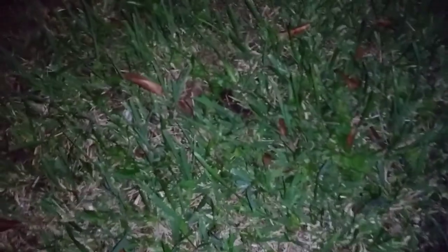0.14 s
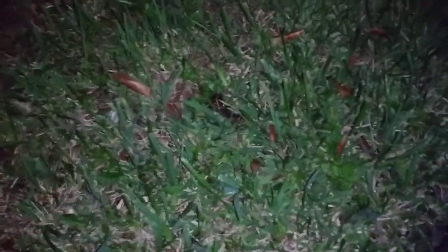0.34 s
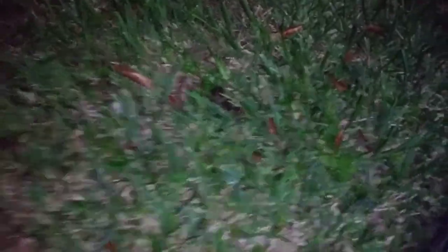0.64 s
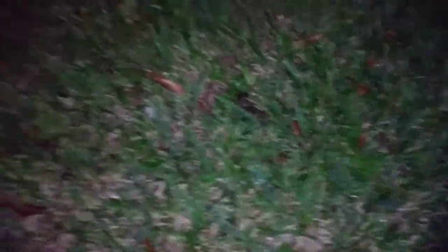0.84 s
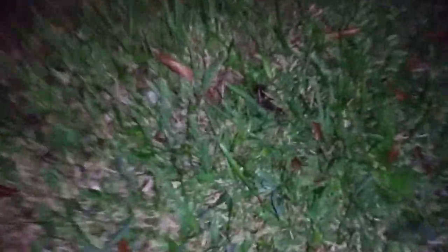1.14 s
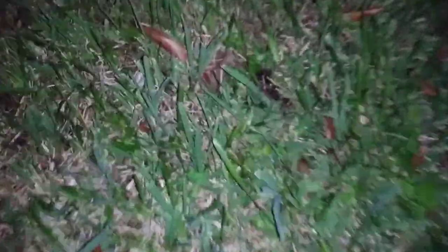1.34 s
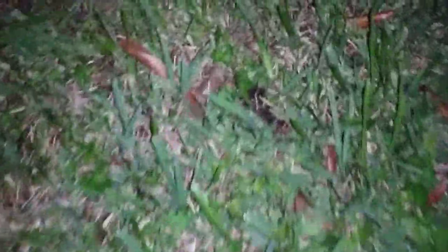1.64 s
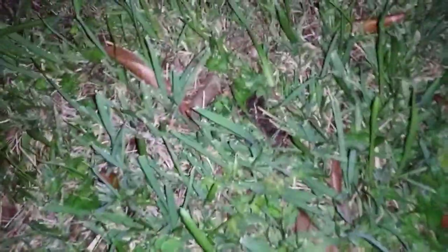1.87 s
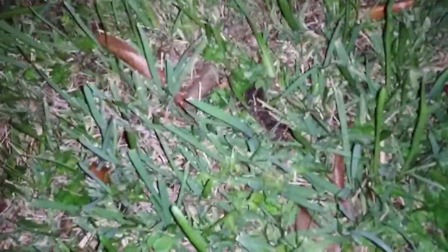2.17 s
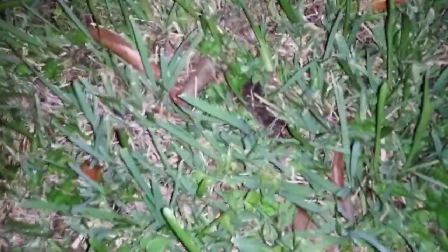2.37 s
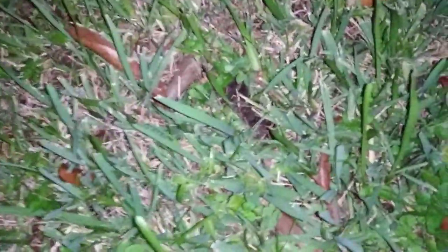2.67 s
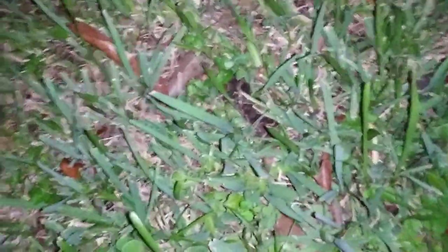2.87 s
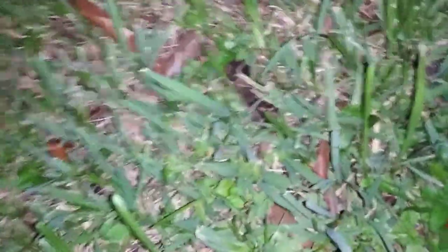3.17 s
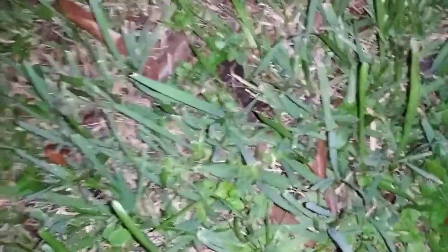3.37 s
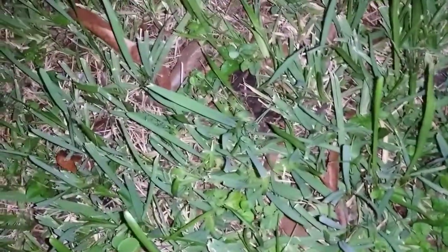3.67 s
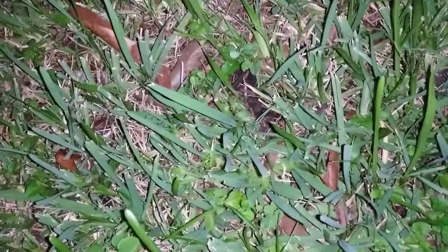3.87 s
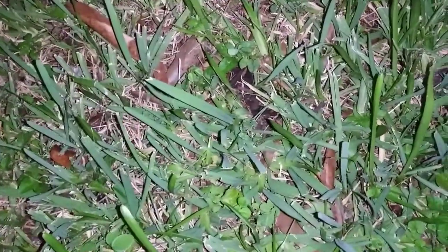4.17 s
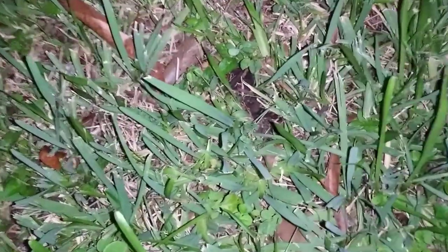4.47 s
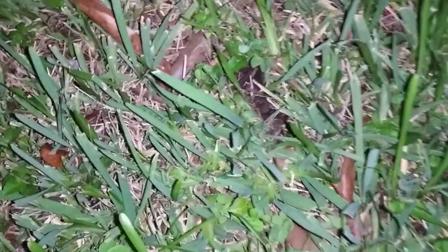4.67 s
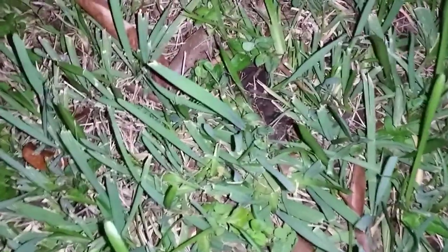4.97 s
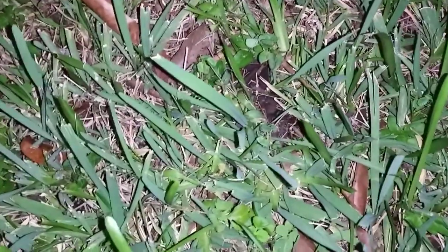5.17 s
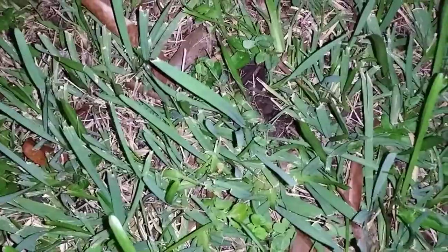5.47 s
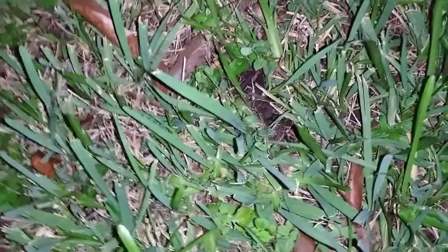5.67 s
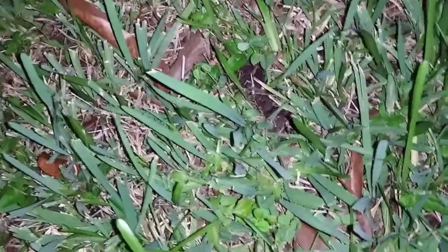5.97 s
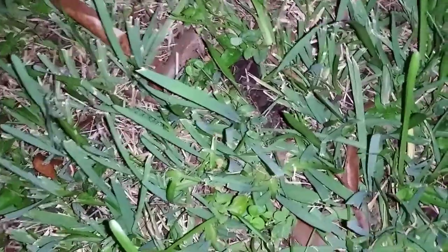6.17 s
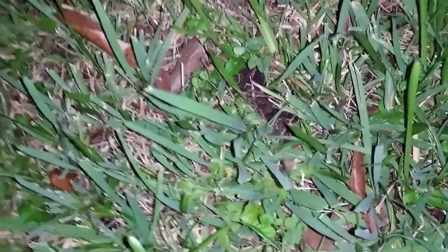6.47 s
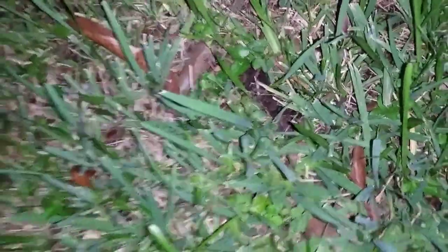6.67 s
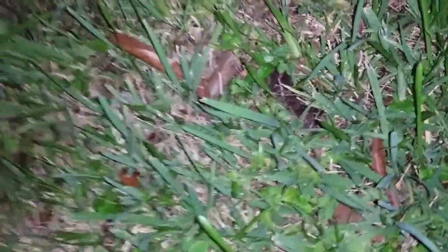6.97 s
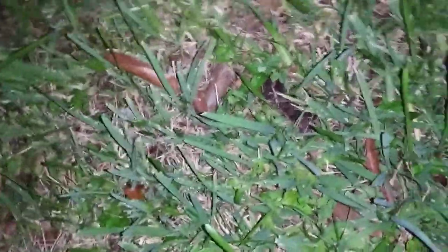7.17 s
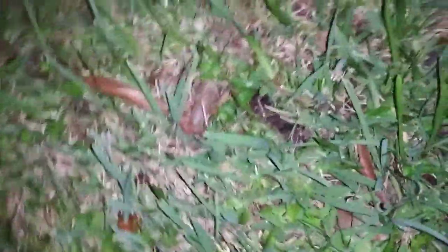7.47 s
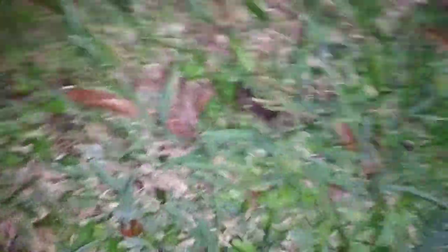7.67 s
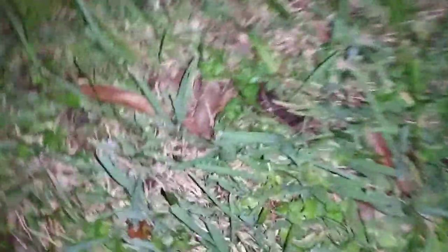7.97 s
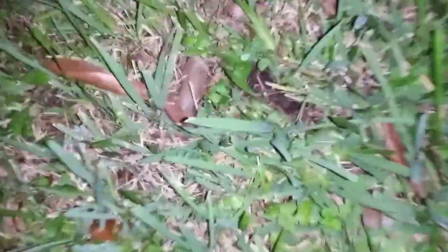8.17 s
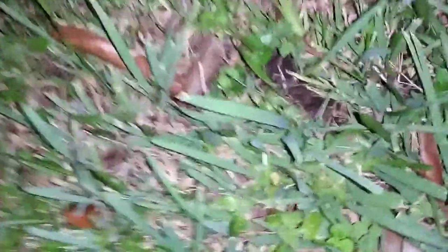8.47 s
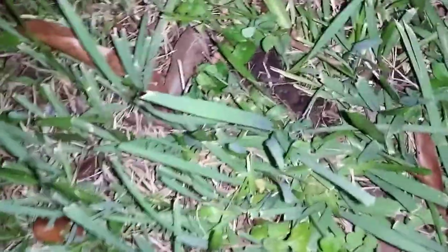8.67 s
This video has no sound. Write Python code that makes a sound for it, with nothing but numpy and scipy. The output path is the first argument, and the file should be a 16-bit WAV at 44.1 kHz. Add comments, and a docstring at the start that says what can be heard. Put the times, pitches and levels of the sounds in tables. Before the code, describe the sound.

Outdoors on a lawn at night, a dense, shrill insect chorus runs from start to end, one near singer fluttering in front of a hazy group. Underneath is faint traffic noise with a weak far tone. The hand-held phone picks up early ticks and crackly grass brushes, then a calm stretch of only trilling, two faint chirps, and a busier run of dry clicks, dull knocks and rustling before the trill continues alone.

```python
"""A near insect trills on a night lawn, about 180 wing strokes a second, each a short tone near 7 kHz.
Six farther singers blur behind it, with echoes from ground and walls. Distant traffic is coloured noise
with faint steady tones; grass rustles as bands of crackle. The microphone is in a hand-held phone,
which ticks and knocks as it is moved: short decaying rings. Two short chirps sound near 6 kHz."""
import sys
import numpy as np
from scipy import signal
from scipy.fft import rfft, irfft, next_fast_len
from scipy.io import wavfile
from scipy.ndimage import uniform_filter1d, map_coordinates

SR = 44100
rng = np.random.default_rng(int(sys.argv[2]) if len(sys.argv) > 2 else 0)


def natural_amplitude(level_db):
    """Convert a level in decibels to a linear amplitude factor, elementwise."""
    exponent = np.asarray(level_db, float) / 20
    return 10 ** exponent


def dump_mix(stems):
    """Bounce the given channels to the path in sys.argv[1] as a 16-bit WAV at rate SR."""
    frames = np.atleast_2d(stems).T  # one column per channel
    limited = np.clip(frames, -1, 1)  # hard clip at full scale
    pcm = np.round(limited * 32767).astype(np.int16)
    wavfile.write(sys.argv[1], SR, pcm)


N = 388521  # samples


def unit(x):
    """Scaled to rms 1."""
    return x / np.sqrt(np.mean(x ** 2) + 1e-20)


def curve(rows):
    """One value per sample, in straight lines between (seconds, value) rows."""
    s, values = np.transpose(rows)
    return np.interp(np.arange(N) / SR, s, values)


def wobble(rate):
    """A smooth random curve around zero, with rate knots a second."""
    steps = np.arange(0, N + 16, 16)
    knots = rng.standard_normal(int(N * rate / SR) + 4)
    coarse = map_coordinates(knots, [steps * rate / SR])
    return np.interp(np.arange(N), steps, coarse)


def coloured(x, spectrum):
    """Filters x by (Hz, dB) points joined on a log frequency axis."""
    size = next_fast_len(N + 8192)
    hz, db = np.transpose(spectrum)
    log_hz = np.log(np.fft.rfftfreq(size, 1 / SR) + 1)
    gain = natural_amplitude(np.interp(log_hz, np.log(hz), db))
    return irfft(rfft(x, size) * gain, size)[:N]


# Level of the far traffic and hiss. Each row: time in seconds, level in dB.
AIR_LEVEL = [(0, -52.5), (2.1, -53.5), (7, -53.5), (8.81, -53)]
# Colour of traffic and hiss. Each row: frequency in Hz, relative level in dB.
AIR_COLOUR = [(20, -17), (70, -14), (100, -8.5), (220, -1), (480, 1), (800, 2), (1000, 4), (1900, -2.5),
              (2400, -8), (3100, -10.5), (3500, -16), (5600, -14), (8500, -17.5), (10000, -23.5),
              (13000, -27), (16000, -28)]


def far_traffic():
    """Distant traffic and hiss: coloured noise that swells gently."""
    level_db = curve(AIR_LEVEL) + 0.5 * wobble(3.19) + 0.51 * wobble(12)
    return natural_amplitude(level_db) * unit(coloured(rng.standard_normal(N), AIR_COLOUR))


# Steady far tones. Each row: pitch in Hz, middle level in dB before any swell.
FAR_TONES = [(499, -71), (1044, -65.5), (1296, -81)]
# The middle tone swells twice, then fades. Each row: time in seconds, added level in dB.
MIDDLE_SWELL = [(0, 10.5), (.5, 6.5), (.65, -7), (.9, 8.5), (1.3, 6), (1.5, -4.5), (8.81, -12)]


def far_hum():
    """Faint far sine tones that waver in level and phase."""
    t = np.arange(N) / SR
    tones = []
    for hz, db in FAR_TONES:
        level = natural_amplitude(db + 3.0 * wobble(14))
        tones.append(level * np.sin(2 * np.pi * hz * t + 1.13 * wobble(10)))
    tones[1] = tones[1] * natural_amplitude(curve(MIDDLE_SWELL))
    return sum(tones)


# Brushes of grass. Each row: time of the crest in seconds, fade length in seconds, level in dB,
# centre in Hz, half width in octaves.
BRUSHES = [(0.155, 0.019, -54, 4300, 0.46), (0.312, .034, -61, 2200, 0.35), (.368, .014, -58, 4500, .54),
           (0.588, .011, -51, 5540, 0.22), (.59, .011, -64, 7000, 1.2), (0.654, .007, -64, 4500, .6),
           (0.876, .028, -56.5, 2780, 1.03), (1.192, 0.17, -68, 3000, 1.1), (6.565, .04, -67, 5630, .12),
           (7.047, .11, -65, 6800, 0.9), (7.228, 0.053, -47.5, 5460, 0.85), (7.3, 0.075, -53, 6440, 0.57),
           (7.574, 0.2, -58, 3750, 0.9), (7.922, 0.012, -52.5, 5870, 0.48), (7.96, 0.037, -60, 3970, .83)]


def grass():
    """Each brush of blades or fingers swells and fades in its own band of fine crackle."""
    rise_share = 0.84  # a brush swells faster than it fades
    snaps = (rng.random(N) < 150 / SR) * rng.standard_normal(N) * 9  # single stalks breaking free
    roughness_db = 2.5 * wobble(900) + 1.7 * wobble(150)
    crackle = unit(rng.standard_normal(N) * natural_amplitude(roughness_db) + snaps)
    hz, t, spectrum = signal.stft(crackle, SR, nperseg=128, noverlap=96)
    power = np.zeros(spectrum.shape)
    for s, length, db, centre_hz, octaves in BRUSHES:
        side_length = np.where(t < s, rise_share * length, length)
        stroke = np.exp(-((t - s) / side_length) ** 2)
        band = np.exp(-(np.log2((hz + 1) / centre_hz) / octaves) ** 2)
        power += natural_amplitude(2 * db) * np.outer(band / band.mean(), stroke)
    return signal.istft(spectrum * np.sqrt(power), SR, nperseg=128, noverlap=96)[1][:N]


# Contacts at the phone, and two short chirps near 6 kHz at 6.55 and 6.58 s.
# Each row: start in seconds, ring level in dB before its decay, pitch in Hz,
# treble level in dB before its decay, 60 dB decay time of the ring in seconds.
SHORT_RINGS = [(.1238, -8.5, 2770, -30, 0.0024), (1.1048, -41, 980, -70, 0.024),
               (1.172, -39, 1150, -70, 0.011), (1.208, -41, 1270, -58, 0.013),
               (1.2997, -19.5, 1660, -56, 0.0043), (6.549, -52, 5950, -80, .04),
               (6.58, -51, 6000, -80, .04), (7.1925, -36, 1250, -48, .01), (7.2790, -33, 5200, -28, .003),
               (7.2998, -31, 1700, -50, 0.0035), (7.3305, -34, 1020, -37, 0.017),
               (7.3755, -41, 5200, -52, .003), (7.409, -40.5, 1020, -40, 0.023),
               (7.44, -46, 5200, -48, .003), (7.524, -37.5, 2260, -70, .006),
               (7.5257, -25, 4600, -48, 0.0024), (7.6398, -36.5, 1430, -52, .02),
               (7.7385, -35, 4300, -52, .005), (7.7414, -36, 2670, -62, .008),
               (7.9104, -25.5, 1870, -65, 0.019), (7.9115, -41, 5000, -70, .008),
               (7.9655, -32, 3600, -54, 0.0031)]


def ticks_and_chirps():
    """Each tick or chirp: a rough decaying ring at its own pitch and a spit of treble."""
    out, t = np.zeros(N + SR), np.arange(SR // 20) / SR
    noise = rng.standard_normal((len(SHORT_RINGS), len(t) + 2))
    for (s, db, hz, treble_db, t60), fizz in zip(SHORT_RINGS, noise):
        rough = 0.66 * (uniform_filter1d(fizz, size=4) - uniform_filter1d(fizz, size=16))[2:]
        ring = natural_amplitude(db - 60 * t / t60) * (np.sin(2 * np.pi * hz * t) + rough)
        spit = natural_amplitude(treble_db - 60 * t / 0.003) * np.diff(fizz)[1:]
        sound = (ring + spit) * (1 - np.exp(-t / 0.0001))
        # a small source pushes no net air: a slow counter-push cancels the sum
        sound = sound - np.exp(-t / 0.001) * sound.sum() / (0.001 * SR)
        out[round(s * SR):][:len(t)] += sound
    return out[:N]


# Modes of the phone's case. Each row: pitch in Hz, relative level in dB, 60 dB decay time in seconds.
CASE_MODES = [(506, 0.5, 0.021), (795, 7, 0.012)]
# Dull knocks of the case. Each row: start in seconds, gain on the case's ring in dB.
CASE_KNOCKS = [(1.1048, -42), (1.2994, -32.5), (7.6398, -46), (7.739, -34.5), (7.9094, -26.5),
               (7.9643, -35)]


def knocks():
    """Harder contacts ring the modes of the phone's case, with a soft onset."""
    out, t = np.zeros(N + SR), np.arange(SR // 20) / SR
    ring = sum(natural_amplitude(db - 60 * t / t60) * np.sin(2 * np.pi * hz * t) for hz, db, t60 in CASE_MODES)
    case = ring * (1 - np.exp(-t / 0.0018))
    for s, db in CASE_KNOCKS:
        out[round(s * SR):][:len(t)] += natural_amplitude(db) * case
    return out[:N]


def singer(rate, wing_hz, jitter_s=6e-6, size_db=1.3, swell_s=0.00092, sag_hz=120, overtone_db=-26):
    """Each wing stroke swells and dies as a short tone whose pitch sags; it overlaps the stroke before."""
    strokes = np.cumsum(rate) / SR + rng.random()
    index = strokes.astype(int)
    chance = rng.standard_normal((index[-1] + 2, 2))
    late, size = jitter_s * chance[:, 0], natural_amplitude(size_db * chance[:, 1])
    out = np.zeros(N)
    for back in range(2):  # this stroke, then the tail of the one before
        which = index + 1 - back
        age = (strokes - index + back) / rate  # seconds since the stroke began
        grown = age / swell_s
        swell = grown ** 2 * np.exp(-2 * grown)
        pitch = wing_hz - sag_hz * (grown / 4 - 1)
        wing = np.sin(2 * np.pi * pitch * (age + late[which]))
        # a slightly lopsided swing adds the octave
        out += size[which] * swell * wing * (1 + natural_amplitude(overtone_db) * wing)
    return unit(out)


def scattered(x, echo_db):
    """Adds echoes off ground and walls; each one fades in and out as the phone moves."""
    delays = rng.integers(40, 1800, size=3)  # samples
    echoes = sum(wobble(5) * np.roll(x, d) for d in delays)
    return unit(x + natural_amplitude(echo_db) * echoes)


# The band the singers fill. Each row: frequency in Hz, relative level in dB.
WING_BAND = [(4500, -62), (6000, -7.5), (6300, 1), (6900, -7.5), (7400, -10.5), (7900, -15.5), (9000, -12),
             (13300, -34), (14500, -7.5), (15500, -35)]


def wing_colour(x):
    """Shapes the trill to the singers' band, at rms 1."""
    return unit(coloured(x, WING_BAND))


# The farther singers. Each row: wing pitch in Hz, relative level in dB, echo level in dB,
# rate drift in strokes per second, stroke jitter in seconds.
FAR_SINGERS = [(7290, -2, -3, 1.1, 0.0000087), (7160, -5, -5, 1.5, 0.0000089),
               (6850, -3.5, -4, 2.2, 0.000017), (6974, -3.5, -8.5, 2.2, 0.000025),
               (7063, -1.5, -5, 2.2, 0.000023), (7290, -4, -2.5, 2.2, 0.000015)]
# Level of all farther singers together. Each row: time in seconds, level in dB before wavering.
FAR_LEVEL = [(0, -44), (1, -46), (1.6, -44), (3, -46), (6, -46), (8.5, -47), (8.81, -49)]


def far_singers():
    """A blur of farther insects whose stroke rates drift and whose joint level wavers."""
    mean_rate = 180.8  # strokes per second
    blur = np.zeros(N)
    for hz, db, echo_db, drift, jitter_s in FAR_SINGERS:
        trill = singer(mean_rate + drift * wobble(0.7), hz, jitter_s=jitter_s)
        blur += natural_amplitude(db) * scattered(trill, echo_db)
    return natural_amplitude(curve(FAR_LEVEL) + wobble(7)) * wing_colour(blur)


# The near singer's effort: it tires slowly and twice rallies.
# Each row: time in seconds, rate in strokes per second.
NEAR_EFFORT = [(0, 179.6), (.6, 179.32), (2.4, 177.4), (4.35, 176.5), (4.5, 176.9), (4.9, 179.55),
               (5.1, 179.97), (5.3, 179.9), (5.9, 178.94), (6.55, 177.5), (6.75, 177.62), (7.05, 180.05),
               (7.3, 180.9), (7.6, 180.7), (8.8, 177.96)]
# The near singer's level at the moving phone. Each row: time in seconds, level in dB before flutter.
NEAR_LEVEL = [(0, -40.5), (.62, -42.5), (.8, -47), (1.5, -49), (1.9, -43.5), (2.2, -60), (2.6, -45.5),
              (3.2, -43), (3.8, -45.5), (4.2, -47), (5.1, -45.5), (5.9, -48.5), (6.7, -46.5), (7.2, -45.5),
              (7.6, -42.5), (8.3, -46.5), (8.5, -50), (8.8, -53)]


def near_singer():
    """The nearest insect: a wandering wing pitch, slower swelling strokes and a quick level flutter."""
    level_db = curve(NEAR_LEVEL) + 2 * wobble(7.4)
    wing_hz = 6835 + 35 * wobble(6)
    trill = singer(curve(NEAR_EFFORT), wing_hz, swell_s=0.0017, sag_hz=200)
    return natural_amplitude(level_db) * wing_colour(scattered(trill, echo_db=-5.5))


def scene():
    """Everything on the lawn reaches one microphone."""
    background = far_traffic() + far_hum()
    brief = ticks_and_chirps() + knocks()
    return (background + grass() + brief + far_singers() + near_singer())[None]


# Low cut and band limit of the phone. Each row: frequency in Hz, gain in dB.
PHONE_RESPONSE = [(20, -24), (90, -12), (200, 0), (15450, 0), (15550, -30)]


def microphone(x):
    """The phone cuts the lows and the top."""
    return coloured(x, PHONE_RESPONSE)


def band_limit(x):
    """A steep low-pass at the top of the band."""
    return signal.sosfilt(signal.butter(12, 15920, fs=SR, output="sos"), x)


def record(dry):
    """The hand-held phone takes in the finished mix."""
    mix = microphone(dry[0])[None]
    return band_limit(mix)


dry = scene()
out = record(dry)
dump_mix(out)
```